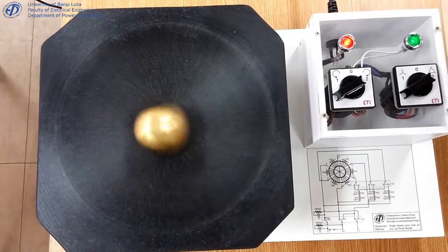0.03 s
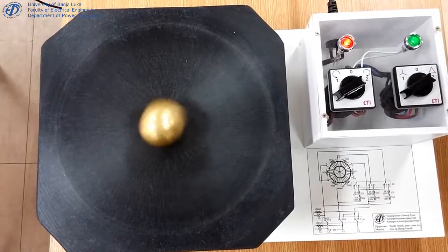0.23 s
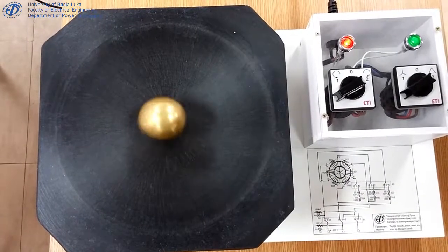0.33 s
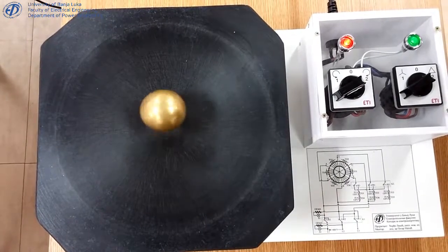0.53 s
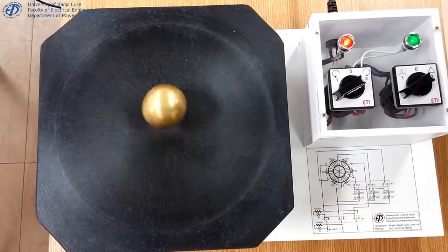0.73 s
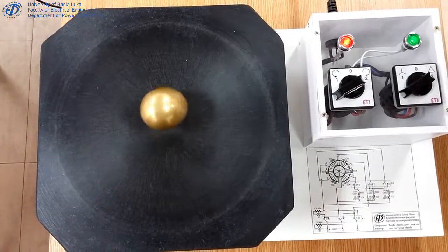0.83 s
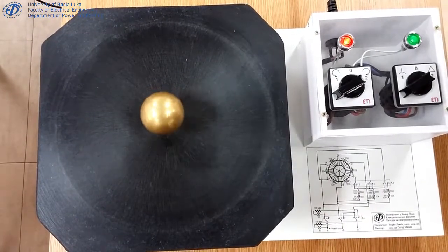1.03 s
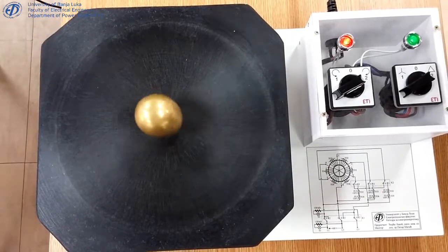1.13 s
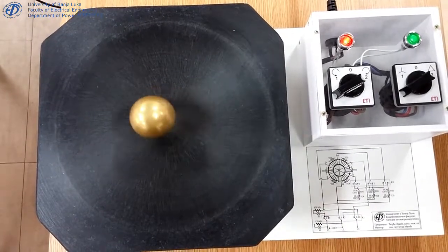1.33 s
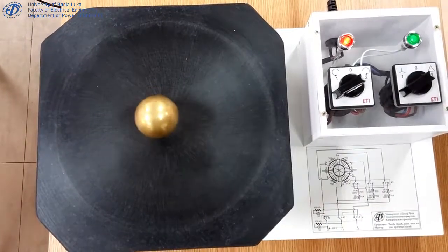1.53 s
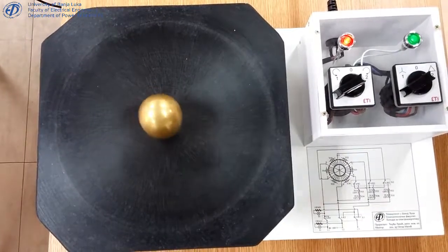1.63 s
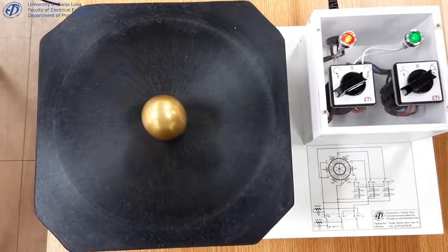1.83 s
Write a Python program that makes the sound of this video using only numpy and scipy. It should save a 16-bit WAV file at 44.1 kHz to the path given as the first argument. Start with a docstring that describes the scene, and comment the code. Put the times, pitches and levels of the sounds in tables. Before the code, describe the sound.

In a small lab, a rolling metal egg makes a plate boom and ring, knocking, bouncing and briefly scraping before it gradually settles. Close stereo microphones also catch a faint electrical hum and soft hiss.

```python
"""A low, wobbling boom swells up: a metal egg rolling on a dished plate, driven by an inductor's turning
field. Tiny bumps, runs of quick bounces and hard knocks ring the plate, which slowly calms; now and then
the egg slips with a short rasp. Behind it the coils hum at twice the mains frequency over a soft hiss.
Heard in a small lab on a stereo pair, with the plate a touch nearer the left microphone."""
import sys
import numpy as np
from scipy import signal
from scipy.fft import rfft, irfft, next_fast_len
from scipy.io import wavfile

SR = 44100
rng = np.random.default_rng(int(sys.argv[2]) if len(sys.argv) > 2 else 0)


def to_wav(s):
    """Save 16-bit WAV."""
    ch = np.atleast_2d(s).T  # columns
    pcm = np.round(np.clip(ch, -1, 1) * 32767)  # PCM
    wavfile.write(sys.argv[1], SR, pcm.astype(np.int16))


N = 83790

# room tone of the lab (frequency [Hz], relative density [dB])
HISS_SPECTRUM = [(20, -12.5), (40, -13), (56, -1.5), (80, -1.5), (120, -4.5), (170, 5.5), (300, -4),
                 (700, -2.5), (1100, -11.5), (2000, -16), (3500, -19.5), (5600, -23.5), (8000, -31),
                 (9800, -29.5), (12500, -35.5), (15500, -33)]
# hum of the coils (frequency [Hz], level [dB])
HUM_PARTIALS = [(100, -65.5), (150, -74), (300, -69)]
# left microphone minus right (frequency [Hz], balance [dB])
MIC_BALANCE = [(250, 0), (340, -1.7), (490, -4.5), (600, 1), (750, -1.3), (1000, -3), (1500, -5),
               (2400, -2.5), (4000, 0)]
# modes of the plate (frequency [Hz], width [Hz], gain [dB])
PLATE_MODES = [(181.8, 12, -13.5), (242, 42.5, -12), (285.2, 37.7, -8), (309, 17.3, -3.5),
               (343.2, 18.5, -1.5), (398, 63.4, -16), (485.6, 92, -16.5), (590, 27.9, -9), (657, 53, -11.5),
               (726.3, 46.8, -12), (808.5, 40, -22), (957, 120, -26)]
# bright modes of plate and shell (frequency [Hz], width [Hz], gain [dB])
BRIGHT_MODES = [(1133, 23, -7), (1442, 36, -1.5), (1502, 63, 0), (1604, 146, -3.5), (2038, 130, -12.5),
                (2196, 93, -6.5), (2605, 140, -12), (3064, 130, -13)]
# rasping resonances of the shell (frequency [Hz], width [Hz], gain [dB])
RASP_MODES = [(2160, 140, 1), (2560, 150, -4.5), (3030, 120, -4.5)]
# brief slips of the egg (peak time [s], grit level [dB], rasp level [dB], length [s])
SLIPS = [(0.329, -64, -54, .014), (0.353, -58, -62.5, .003), (0.406, -70, -50, 0.025),
         (0.427, -69, -55.5, 0.016), (0.473, -66, -56, .008), (0.689, -74, -63, 0.049),
         (.736, -60, -66, 0.0046), (0.943, -78, -58, .018), (1.277, -76, -65.5, 0.04)]
# grit of a slip (frequency [Hz], relative density [dB])
SLIP_SPECTRUM = [(1000, -19), (2500, 0), (4100, 2), (5500, -1.5), (7000, -4), (8000, -15.5), (10500, -5),
                 (15000, -19.5)]
# hard knocks of the egg (time [s], clunk peak [dB], ping peak [dB])
HARD_KNOCKS = [(.096, -38.5, -62), (.225, -35, -59), (.333, -15.5, -39.5), (.379, -27, -46),
               (0.403, -25, -54.5), (0.432, -29, -43.5), (.447, -20.5, -41), (.459, -18.5, -45),
               (.515, -22.5, -47), (.695, -22.5, -45.5), (0.856, -36.5, -49.5), (.921, -27, -52.5),
               (0.964, -29, -52.5), (1.011, -28.5, -44.5), (1.114, -32, -53), (1.295, -25, -50),
               (1.346, -31.5, -49.5), (1.563, -34, -60), (1.594, -36, -57)]
# runs of quick bounces (peak time [s], relative level [dB], length [s], bounce rate [Hz])
BOUNCE_RUNS = [(0.057, -42.5, 0.022, 329.5), (.203, -31, 0.014, 324), (0.276, -28, 0.021, 341.8),
               (0.29, -23.5, 0.011, 313.7), (0.344, -17.5, 0.028, 344.2), (0.392, -25, 0.0081, 349),
               (0.434, -21, 0.01, 343.4), (0.488, -21.5, .017, 357), (0.521, -16, .013, 333.1),
               (0.551, -25, 0.015, 325), (0.601, -25, 0.014, 320), (0.629, -18, 0.025, 342.4),
               (0.655, -19.5, .01, 355.4), (.68, -18.5, 0.0093, 348), (0.715, -24, 0.011, 327.2),
               (0.783, -25.5, 0.028, 338.5), (0.898, -22.5, 0.036, 335), (0.914, -19.5, 0.01, 339),
               (0.984, -20, 0.0071, 341.6), (1.019, -21, 0.01, 332.6), (1.122, -20, 0.022, 328),
               (1.189, -31, .014, 332), (1.203, -23.5, 0.018, 334.2), (1.298, -20, 0.016, 353.9),
               (1.353, -25, 0.018, 327), (1.423, -28, 0.013, 326.5), (1.523, -37, 0.022, 339),
               (1.663, -30.5, 0.03, 331)]
# dry contact noise of rolling (frequency [Hz], relative density [dB])
GRIT_SPECTRUM = [(200, -6), (1000, 9), (1300, -4), (2000, -3), (3200, -1.5), (4200, -8.5), (6000, -15),
                 (8000, -31), (11000, -18.5), (15000, -38)]
# swells of the plate's lowest mode (time [s], relative level [dB])
DRONE_SWELLS = [(0, -64.5), (.2, -54.5), (.33, -45.5), (.55, -45), (0.801, -46), (1.04, -43.5), (1.08, -54),
                (1.13, -42.5), (1.25, -51.5), (1.3, -40), (1.47, -55), (1.53, -46.5), (1.67, -47),
                (1.72, -61.5), (1.9, -66)]
# swells of the boom, following how hard the egg rolls (time [s], relative level [dB])
BOOM_SWELLS = [(0.0, -59.5), (0.056, -48.5), (0.13, -46.5), (0.21, -38), (0.33, -31), (0.491, -29),
               (0.58, -32.5), (0.701, -31.5), (0.82, -38.5), (0.89, -33), (1.0, -34), (1.071, -38.5),
               (1.169, -35.5), (1.26, -35.5), (1.33, -33.5), (1.398, -40), (1.468, -47.5), (1.609, -39.5),
               (1.68, -46), (1.772, -63), (1.87, -46.5), (1.9, -50.5)]
# swells of the plate's upper modes (time [s], relative level [dB])
UPPER_SWELLS = [(0.0, -68.5), (0.2, -48.5), (0.316, -35.5), (0.339, -29.5), (0.373, -31.5), (0.43, -29),
                (0.467, -26), (0.569, -45), (0.703, -31), (0.74, -39), (0.872, -42), (0.935, -30.5),
                (0.956, -42.5), (1.024, -38), (1.067, -44), (1.12, -38.5), (1.2, -40.5), (1.255, -43.5),
                (1.294, -39.5), (1.434, -50.5), (1.571, -48), (1.612, -43), (1.772, -68.5), (1.86, -54.5),
                (1.9, -53)]
# swells of the bright modes and grit (time [s], relative level [dB])
TREBLE_SWELLS = [(0.0, -75.5), (0.296, -58), (0.338, -49.5), (0.358, -55.5), (0.386, -50), (0.406, -53),
                 (0.46, -48), (0.544, -58), (0.598, -59), (0.682, -54.5), (0.824, -60.5), (0.942, -59.5),
                 (1.18, -63.5), (1.29, -58.5), (1.444, -69), (1.884, -77.5), (1.9, -83)]

TIME = np.arange(N) / SR


def undb(db):
    """Decibels to gain."""
    return 10 ** (np.asarray(db) / 20)


def rms(x):
    """Root-mean-square level."""
    return np.sqrt(np.mean(x ** 2))


def cut(x, hz, kind, order):
    """Smooth high-, low- or band-pass."""
    return signal.sosfilt(signal.butter(order, hz, kind, fs=SR, output="sos"), x)


def follow(curve):
    """Gain over time from (time [s], level [dB]) points."""
    return undb(np.interp(TIME, *np.array(curve).T))


def swell(peak_s, length_s):
    """Bell-shaped gain, length_s wide at half height."""
    return 2 ** -((2 * (TIME - peak_s) / length_s) ** 2)


def colour(x, points):
    """Shapes x by (frequency [Hz], gain [dB]) points, at unit level."""
    hz, db = np.array(points, float).T
    f = np.maximum(np.fft.rfftfreq(N, 1 / SR), 1)
    shaped = irfft(rfft(x) * undb(np.interp(np.log(f), np.log(hz), db)), N)
    return shaped / rms(shaped)


def wide_noise(wide_hz):
    """Diffuse noise, nearly alike at both microphones in the bass and unrelated above wide_hz."""
    mid, side = rng.standard_normal((2, N))
    side = cut(side, wide_hz, "high", order=2) + undb(-14.5) * cut(side, 80, "low", order=2)
    return np.array([mid + side, mid - side]) / np.sqrt(2)


def room_hiss(level_db=-56.5):
    """Soft, steady room tone all around the microphones."""
    return undb(level_db) * colour(wide_noise(wide_hz=900), HISS_SPECTRUM)


def coil_hum(sizzle_db=-80, pulse_hz=200):
    """The inductor hums in the centre, with a faint sizzle pulsing in time with the mains."""
    hum = sum(np.sqrt(2) * undb(db) * np.sin(2 * np.pi * (hz * TIME + rng.random()))
              for hz, db in HUM_PARTIALS)
    sizzle = cut(rng.standard_normal((2, N)), [3800, 7000], "band", order=2)
    sizzle *= np.sin(np.pi * pulse_hz * TIME) ** 2
    return hum + undb(sizzle_db) * sizzle / rms(sizzle)


def lab_reverb(x, wet_db, t60_s=0.22, gap_s=0.004):
    """The near walls add a short, diffuse tail just behind the direct sound."""
    tail = wide_noise(wide_hz=440) * np.exp(-np.log(1000) * TIME / t60_s) * (TIME > gap_s)
    tail /= np.sqrt(np.sum(tail ** 2) / 2)
    return x + undb(wet_db) * signal.fftconvolve(x, tail, axes=1)[:, :N]


def at_microphones(x, right_lag_s=0.00004):
    """The plate beams each pitch a little to one side, and reaches the left microphone first."""
    hz, db = np.array(MIC_BALANCE).T
    size = next_fast_len(N + SR // 10)
    f = np.maximum(np.fft.rfftfreq(size, 1 / SR), 1)
    lean = undb(np.interp(np.log(f), np.log(hz), db) / 2)
    sides = np.array([lean, np.exp(-2j * np.pi * f * right_lag_s) / lean])
    return irfft(rfft(x, size) * sides, size)[:, :N]


def ring(force, modes, polarity=-1):
    """Damped modes pushed by a force; neighbours swing against each other (-1) or in step (1)."""
    return sum(polarity ** k * undb(db) * signal.lfilter(*signal.iirpeak(hz, hz / width, SR), force)
               for k, (hz, width, db) in enumerate(modes))


def radiate(x):
    """The plate gives off little below its first mode or above its main ones."""
    return cut(cut(x, 164, "high", order=6), 1030, "low", order=4)


def bumps(per_s=1600, scatter_db=4.5):
    """Force of the tiny bumps that pass under the egg, at random times and of random size."""
    hits = (rng.random(N) < per_s / SR) * rng.choice([-1, 1], N)
    return hits * undb(scatter_db * rng.standard_normal(N))


def slips():
    """The egg slips for a moment: a gritty burst that sets its shell rasping."""
    grit_gain, rasp_gain = np.zeros((2, N))
    for peak_s, grit_db, rasp_db, length_s in SLIPS:
        slip = swell(peak_s, length_s)
        grit_gain += undb(grit_db) * slip
        rasp_gain += undb(rasp_db) * slip
    force = bumps()
    shell = ring(force, RASP_MODES)
    return grit_gain * colour(force, SLIP_SPECTRUM) + rasp_gain * shell / rms(shell)


def knocks(contact_s=0.00047):
    """Each knock is a short, hard push that clunks on the plate and pings its bright modes."""
    age = 2 * np.pi * TIME / contact_s
    push = age * np.exp(-age) + 1e-18
    clunk, ping = radiate(ring(push, PLATE_MODES)), ring(push, BRIGHT_MODES)
    clunk_hits, ping_hits = np.zeros((2, N))
    for start_s, clunk_db, ping_db in HARD_KNOCKS:
        clunk_hits[int(start_s * SR)] = undb(clunk_db)
        ping_hits[int(start_s * SR)] = undb(ping_db)
    return [signal.fftconvolve(hits, sound / np.abs(sound).max())[:N]
            for hits, sound in [(clunk_hits, clunk), (ping_hits, ping)]]


def bounces(direct_db=-2.5, ring_db=-16.5):
    """The egg springs on its elastic contact: each run swells, dies away and leaves the plate ringing."""
    force = np.zeros(N)
    for peak_s, db, length_s, hz in BOUNCE_RUNS:
        force += undb(db) * swell(peak_s, length_s) * np.sin(2 * np.pi * (hz * TIME + rng.random()))
    ringing = radiate(ring(force + 1e-18, PLATE_MODES, polarity=1))
    return undb(direct_db) * force + undb(ring_db) * ringing


def rolling(split_hz=450, drone_db=-0.5, boom_db=1, upper_db=-0.5, bright_db=-0.5, grit_db=-9.5):
    """The bumps ring the plate in swells; the hardest rolling brings out bright modes and some grit."""
    force = bumps()
    boom_modes = [mode for mode in PLATE_MODES[1:] if mode[0] < split_hz]
    upper_modes = [mode for mode in PLATE_MODES if mode[0] >= split_hz]
    body = np.zeros(N)
    for modes, swells, db in [(PLATE_MODES[:1], DRONE_SWELLS, drone_db),
                              (boom_modes, BOOM_SWELLS, boom_db),
                              (upper_modes, UPPER_SWELLS, upper_db)]:
        band = radiate(ring(force, modes))
        body += undb(db) * follow(swells) * band / rms(band)
    bright = ring(force, BRIGHT_MODES)
    treble = undb(bright_db) * bright / rms(bright) + undb(grit_db) * colour(force, GRIT_SPECTRUM)
    return body, follow(TREBLE_SWELLS) * treble


def scene():
    """Egg and plate over hum and hiss: the boom sounds close and dry, the treble carries more room."""
    roll_body, roll_treble = rolling()
    clunks, pings = knocks()
    hiss = room_hiss()
    body = at_microphones(roll_body + bounces() + clunks)
    treble = at_microphones(roll_treble + pings + slips())
    return lab_reverb(body, wet_db=-13) + lab_reverb(treble, wet_db=-1.5) + coil_hum() + hiss


def record(dry):
    """The recorder cuts the top steeply above 15.6 kHz."""
    return signal.sosfilt(signal.ellip(10, .2, 70, 15600, fs=SR, output="sos"), dry)


dry = scene()
out = record(dry)
to_wav(out)
```